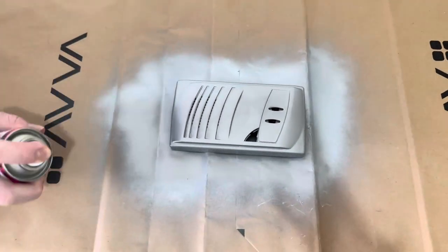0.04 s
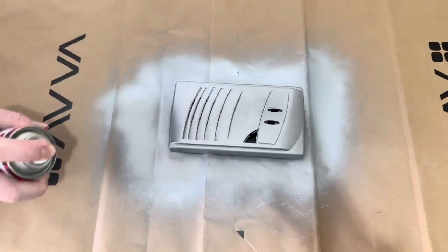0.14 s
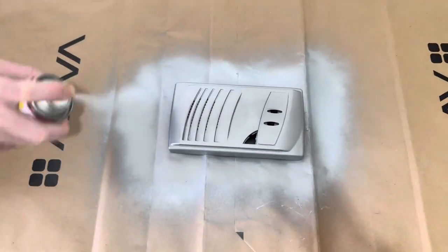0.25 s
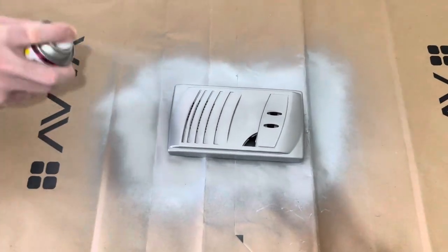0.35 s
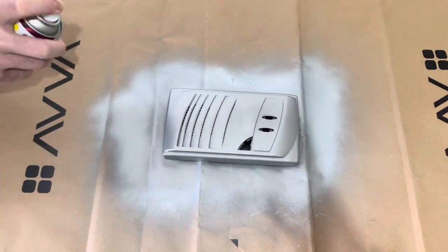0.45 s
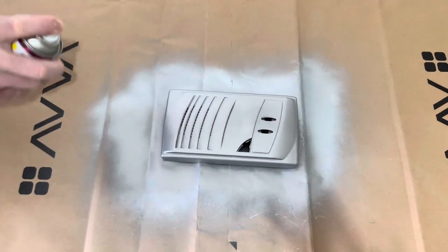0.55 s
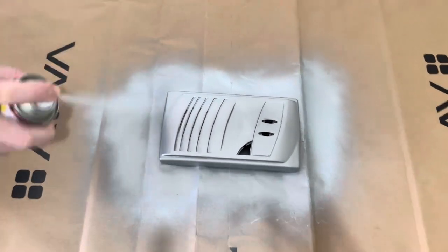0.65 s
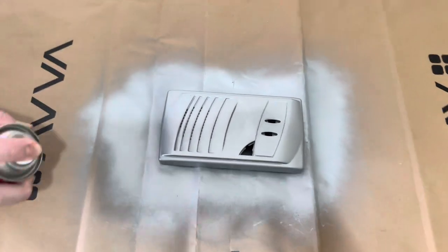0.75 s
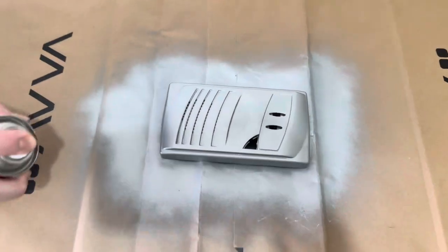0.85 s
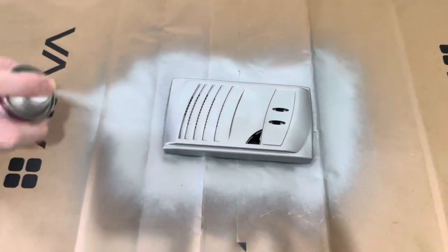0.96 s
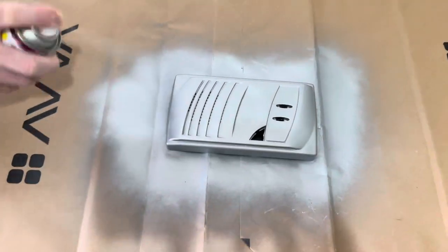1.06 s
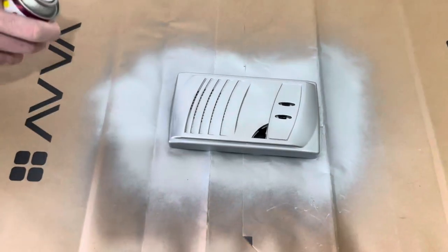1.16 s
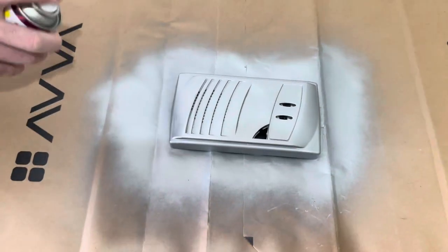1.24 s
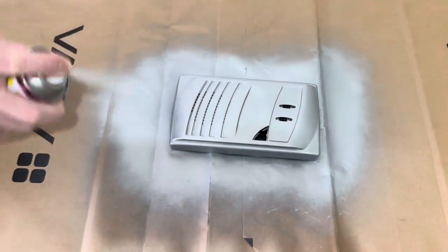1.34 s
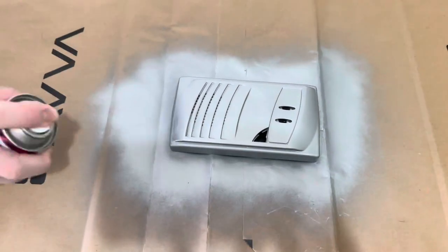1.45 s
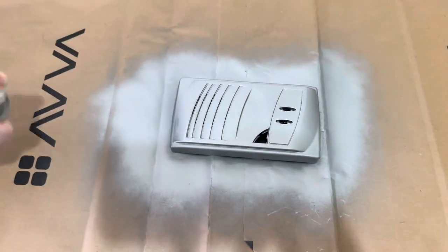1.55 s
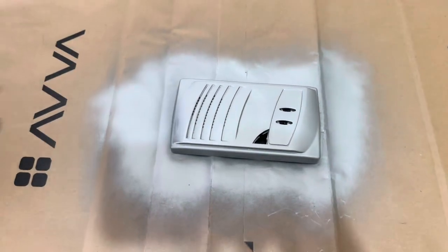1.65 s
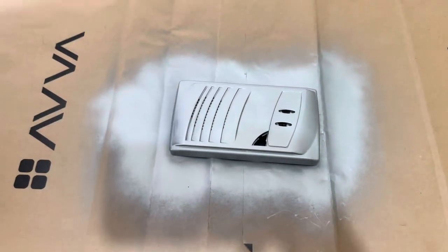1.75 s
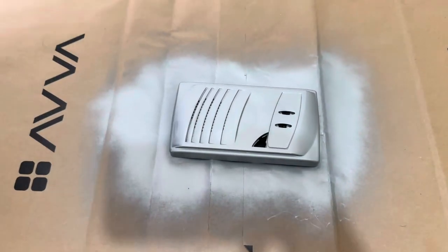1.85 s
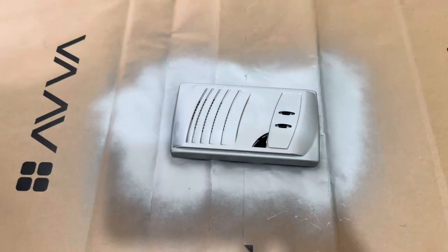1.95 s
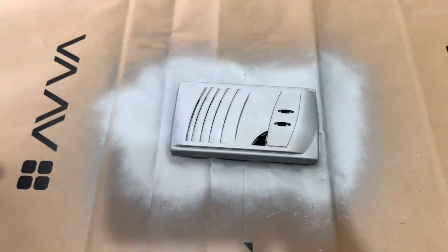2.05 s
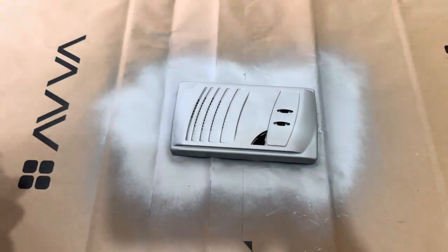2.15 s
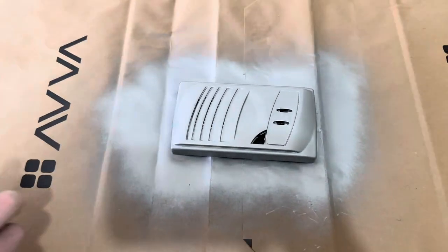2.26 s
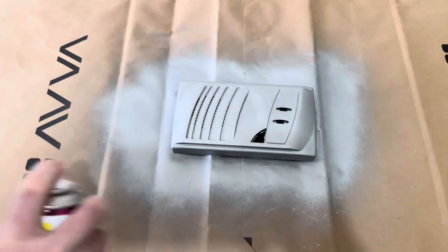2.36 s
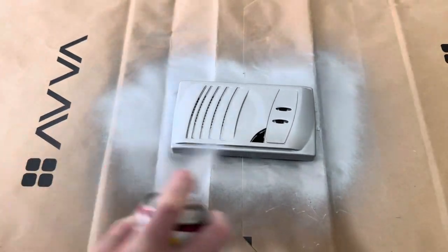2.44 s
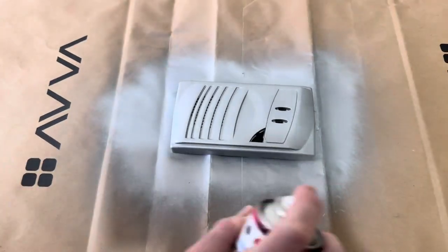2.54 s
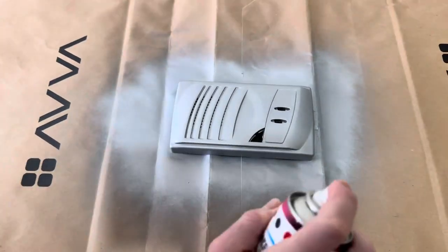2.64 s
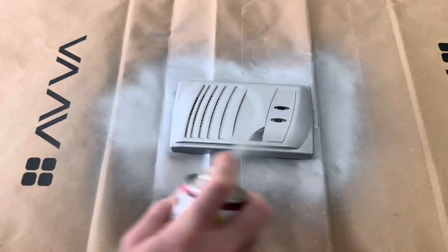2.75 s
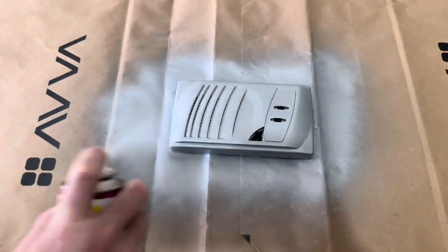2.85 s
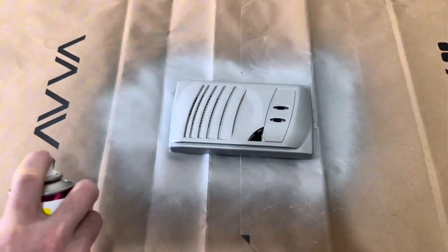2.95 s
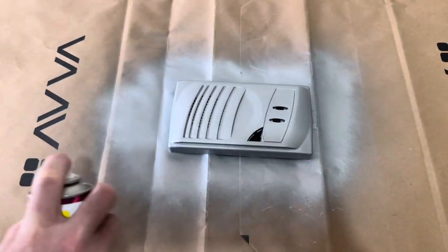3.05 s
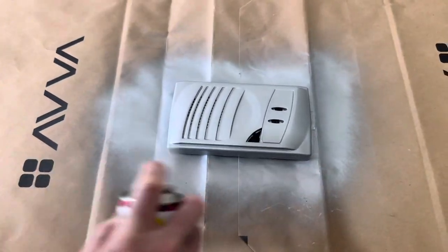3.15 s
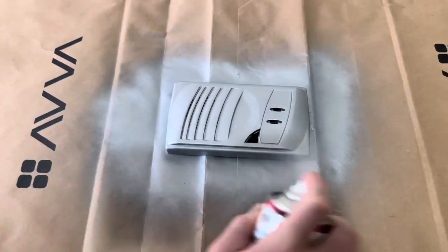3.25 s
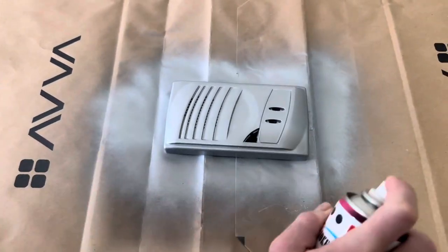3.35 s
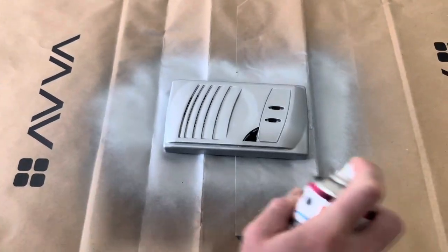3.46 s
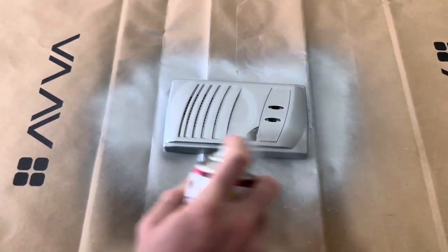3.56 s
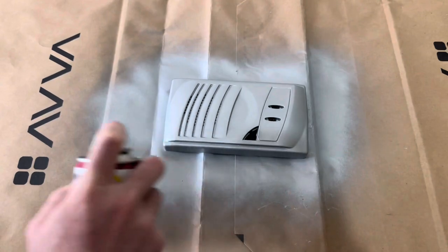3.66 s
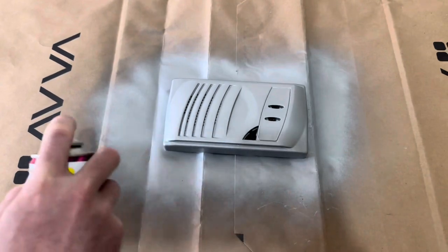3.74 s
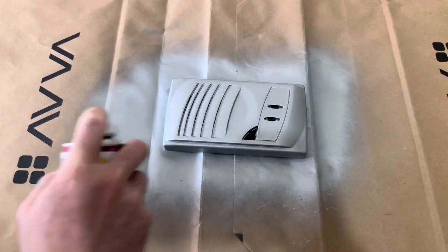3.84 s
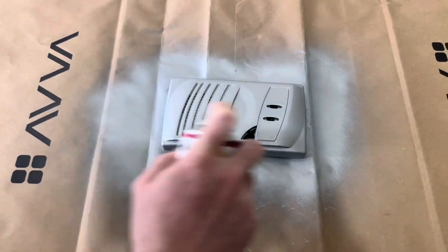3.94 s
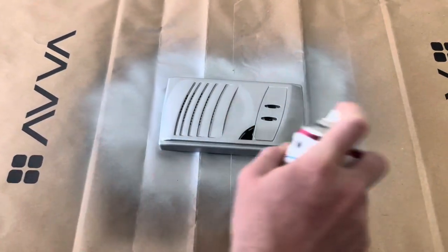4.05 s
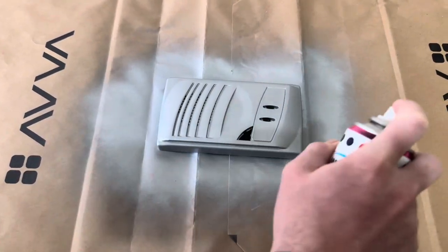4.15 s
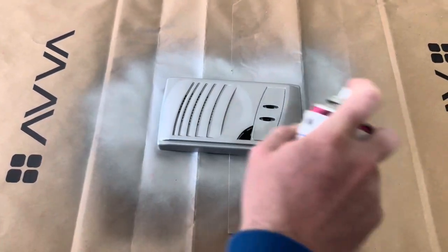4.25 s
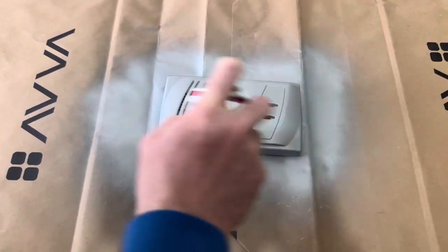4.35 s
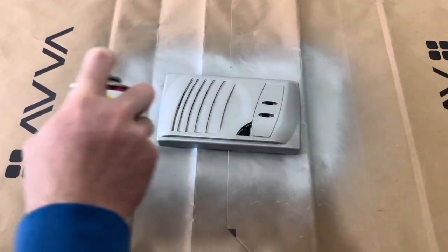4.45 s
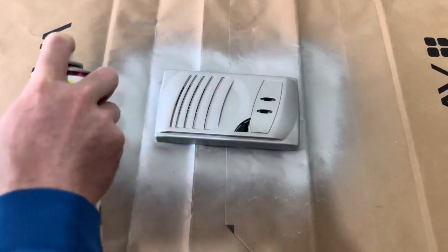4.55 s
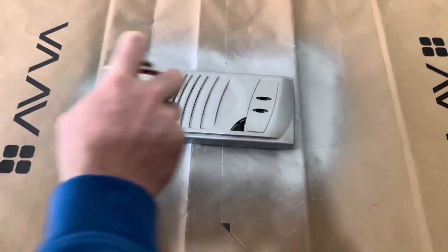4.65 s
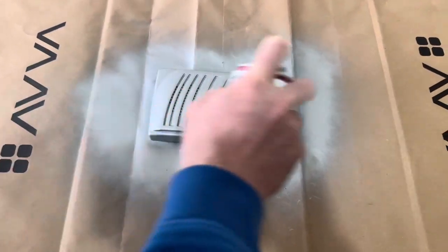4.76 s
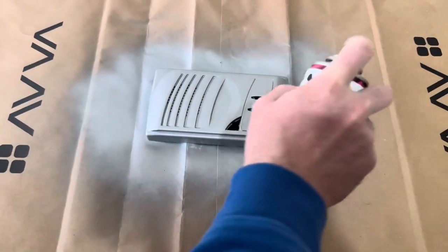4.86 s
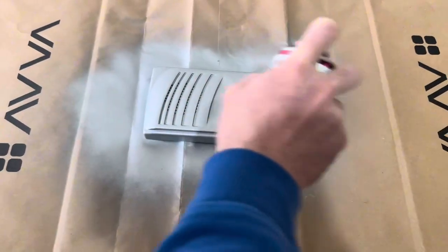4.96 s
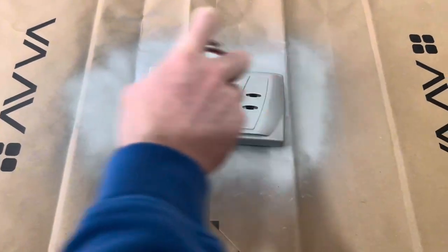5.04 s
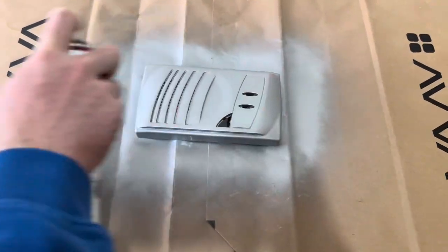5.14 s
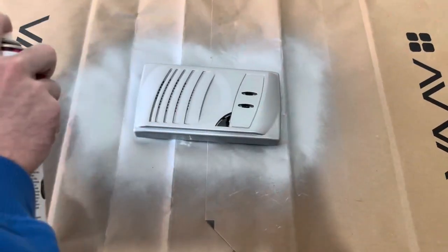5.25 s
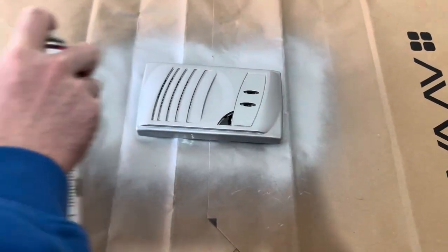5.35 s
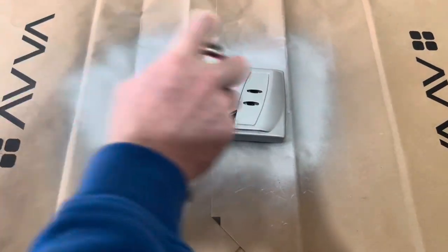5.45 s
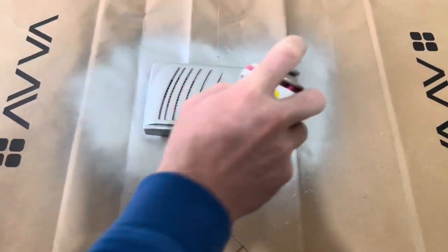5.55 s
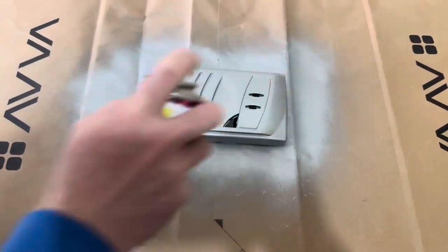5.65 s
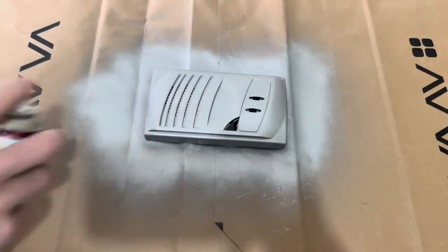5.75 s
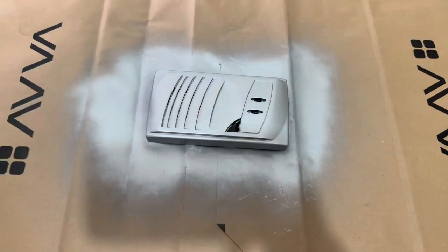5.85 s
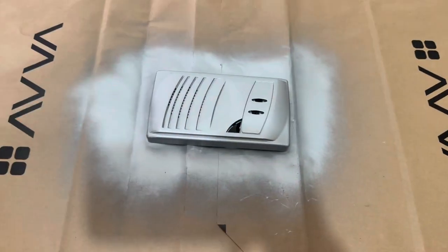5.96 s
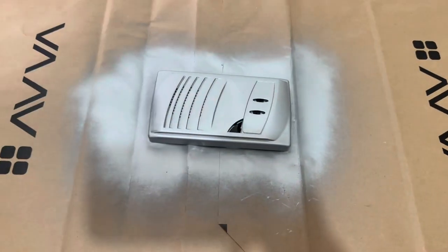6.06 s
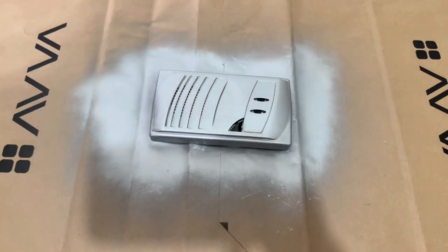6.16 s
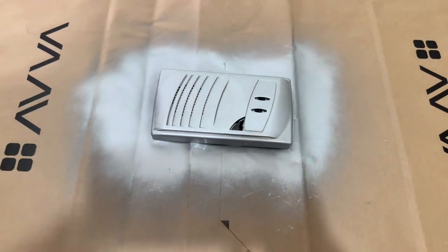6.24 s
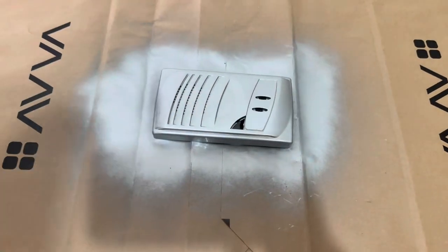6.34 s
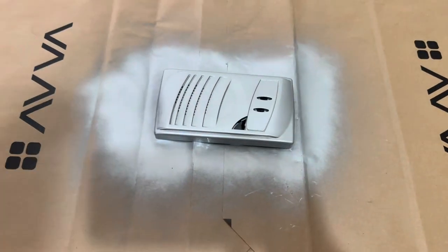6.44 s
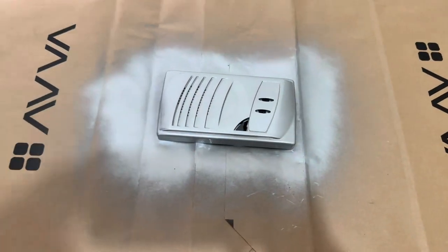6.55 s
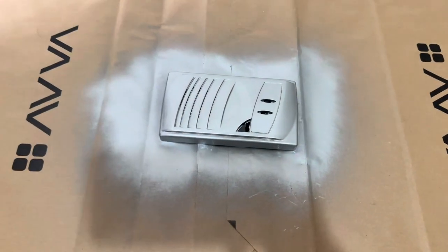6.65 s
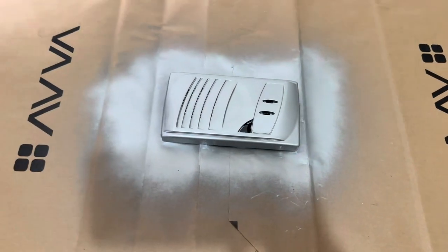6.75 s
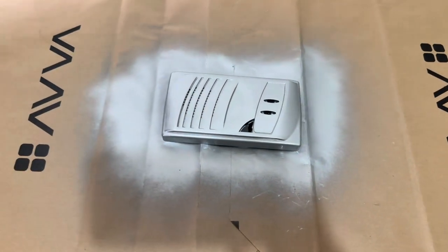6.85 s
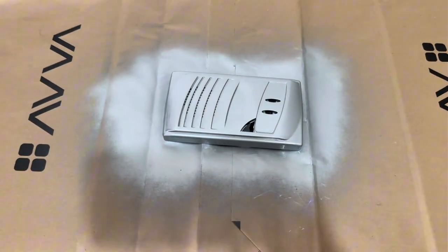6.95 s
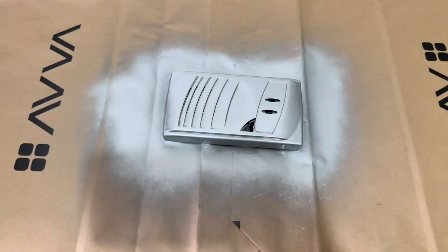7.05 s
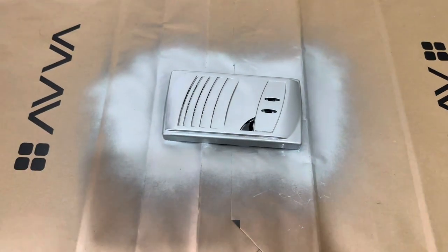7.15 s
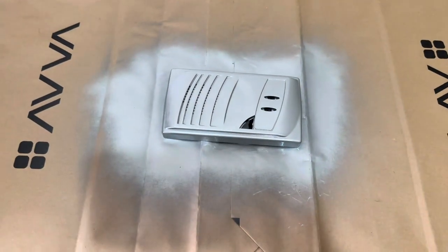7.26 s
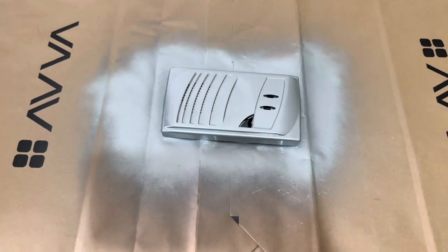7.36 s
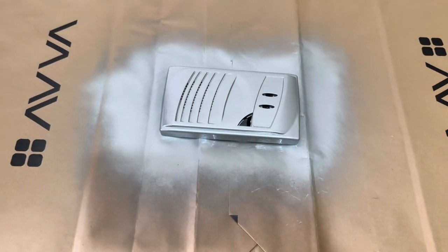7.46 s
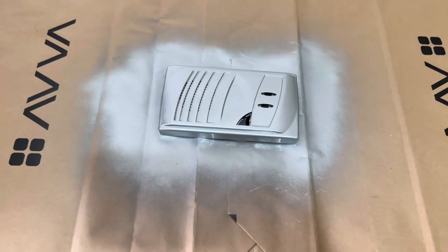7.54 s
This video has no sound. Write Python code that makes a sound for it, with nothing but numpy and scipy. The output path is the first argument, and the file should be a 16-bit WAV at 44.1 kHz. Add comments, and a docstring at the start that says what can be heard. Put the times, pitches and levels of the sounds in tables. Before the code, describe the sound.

Close in a small room, a spray can gives five short hissing puffs, the jet roaring softly across a box on cardboard. The mixing ball then rolls and knocks brightly in the steel can. Nine more puffs follow at an even pace, then a brief rattle, a soft thud, and a longer rattle with rustling sleeve. Phone pickup, faint rumble and short echo.

```python
"""In a small room, a paint can sprays short bursts over a small box on a cardboard sheet, close under a phone.
The jet is shaped noise: a hiss at the nozzle and a roar where it strikes. Sheet, box and air hum as wavering
tones. Between bursts the mixing ball rolls and knocks, as noise grains and short pushes ringing the steel can.
There are also two finger taps, a soft thud, a sleeve rustling as patchy noise, a faint rumble and room echo."""
import sys
import numpy as np
from scipy import signal
from scipy.fft import rfft, irfft
from scipy.io import wavfile
from scipy.ndimage import uniform_filter1d

SR = 44100
rng = np.random.default_rng(int(sys.argv[2]) if len(sys.argv) > 2 else 0)


def file_out(sig):
    """Save sig as 16-bit WAV at sys.argv[1]."""
    # one column per channel
    cols = np.atleast_2d(sig).T
    # limit, then scale
    lim = np.clip(cols, -1, 1)
    pcm = np.round(lim * 32767).astype(np.int16)
    wavfile.write(sys.argv[1], SR, pcm)


N = 335160

# Room and pickup
# slow level curve of the room rumble: t/s, level/dB
RUMBLE_LEVEL = [(0, -82), (.6, -78.5), (1.3, -83.5), (2.0, -69.5), (3.1, -77.5), (4.6, -80), (5.7, -79.5),
                (5.9, -80), (6.6, -80), (7.1, -70.5), (7.6, -65.5)]
# colour of the rumble: f/Hz, level per Hz/dB
RUMBLE_COLOUR = [(12, -33), (20, 4.5), (58, -1), (175, -2), (742, -9.5), (1750, -6.5), (3410, -17.5),
                 (5980, -20.5), (8700, -17.5), (12000, -32.5), (15600, -69), (22000, -120)]
# low resonances of the room: f/Hz, width/Hz, level/dB
ROOM_MODES = [(50, 7.8, 1), (126, 6.1, -7.5), (238, 18, -6)]
# time for the echo to fall by 60 dB: f/Hz, time/s
ROOM_T60 = [(60, 0.94), (300, 0.34), (1000, 0.4), (4000, 0.36), (10000, 0.16), (16000, 0.12)]
# how alike the two microphone ports hear: f/Hz, likeness/0-1
LIKENESS = [(30, 0.9), (170, 0.71), (350, 0.6), (600, .2), (1500, 0.1), (6000, 0), (9000, 0), (12500, 0.3),
            (16000, 1)]
# left port over right: f/Hz, level/dB
LEFT_LEAN = [(200, -0.5), (600, -0.5), (4400, 1.5), (9000, -.5)]
ROOM_DB, PORT_LAG_S = -1, 0.00015  # echo level; the left port hears this much later
TOP_HZ = 15900  # the phone cuts above this
OCTAVE_CENTRES_HZ = 40 * 2. ** np.arange(10.)

# Sleeve and thud
# sleeve strokes: loudest at t/s, level/dB, rise/dB per s
SLEEVE_STROKES = [(2.37, -61, 88), (5.8, -69, 195.5), (6.05, -67, 114), (6.18, -69, 62), (6.328, -63.5, 57),
                  (7.12, -71.5, 43), (7.48, -61.5, 35)]
# colour of the cloth noise: f/Hz, level per Hz/dB
CLOTH_COLOUR = [(250, -15.5), (500, -11.5), (900, -6.5), (1900, -2), (2700, -6), (3600, -13.5),
                (5200, -11.5), (6000, -9.5), (7000, -19), (10000, -27.5), (15000, -41)]
SLEEVE_FALL_DB_PER_S = 97.5
ARM_RUMBLE_DB = -11.5  # low stir of the moving arm, over the sleeve level
# resonances of the cardboard under the thud: f/Hz, width/Hz, level/dB
CARDBOARD = [(266, 97, 0.5), (537, 170, -5), (712, 170, -5.5), (1810, 820, -15.5)]
THUD_S, THUD_DB, THUD_T60_S = 6.533, -51.5, 0.28

# Ball and can
# rolls along the wall: t/s, length/s, ring level at start/dB, change to the end/dB, body level/dB, note level/dB
ROLLS = [(1.605, 0.15, -57.5, 3.5, -82, -81), (1.817, 0.057, -56, -1.5, -79, -58.5),
         (1.89, 0.11, -50, -4, -77, -83), (1.979, 0.069, -54.5, -10, -80, -81),
         (5.585, 0.19, -51, -5.5, -63.5, -74), (6.526, 0.12, -66.5, -7, -72.5, -68),
         (6.81, 0.13, -71, -3, -97, -63.5), (6.982, 0.079, -61, -4, -89, -66),
         (7.216, 0.074, -68, -9, -63, -66), (7.283, 0.034, -60.5, 5, -71, -62),
         (7.314, 0.2, -50, -15, -46.5, -69), (7.547, 0.075, -46, -10.5, -62, -58)]
# ball knocks: t/s, peak level of the push/dB
KNOCKS = [(1.6315, -44), (1.6806, -41), (1.8223, -56), (1.8338, -47), (1.843, -50), (1.8736, -34),
          (1.888, -53), (1.9074, -38), (1.931, -57), (2.0422, -38.5), (2.052, -60), (2.0634, -53),
          (5.6941, -47), (6.815, -66), (6.9876, -50), (7.0175, -53), (7.2186, -45.5), (7.2537, -45),
          (7.2882, -41), (7.3119, -35.5), (7.367, -35), (7.5513, -36), (7.577, -41)]
# dull finger taps on the can: t/s, peak level of the push/dB
TAPS = [(0.8249, -51.5), (0.9522, -60)]
# resonances of the can wall: f/Hz, width/Hz, level/dB
CAN_WALL = [(1555, 257, -8), (2410, 510, -6), (3930, 320, -7), (4280, 100, 0), (4740, 400, -2.5),
            (6030, 330, -6), (6760, 1300, -13), (9010, 1200, -12), (14800, 520, -17)]
# lower resonances of the whole can: f/Hz, width/Hz, level/dB
CAN_BODY = [(505, 61, -9), (814, 60, 0.5), (1106, 120, -3.5)]
# single note of the wall under a rolling ball: f/Hz, width/Hz, level/dB
WALL_NOTE = [(1726, 30, 0)]
ROLL_ARCH_DB = 1.5  # lift in mid roll
KNOCK_BODY_DB, TAP_RING_DB = -17.5, 0.5  # how much a knock rings the body, and a tap the wall

# Spray
# bursts: valve opens t/s, held/s, hiss level/dB, box roar level/dB,
# share of the stroke at which the jet crosses the box/0-1, box hum level/dB, air thump level/dB
BURSTS = [(-0.13, 0.15, -35.5, -56.5, 0.52, -64.5, -53.5), (0.238, 0.14, -37, -54, 0.67, -59, -72),
          (0.618, 0.13, -36.5, -49.5, 0.57, -67, -76.5), (0.977, 0.13, -35.5, -53.5, 0.68, -51, -70.5),
          (1.339, 0.14, -36, -59, 0.5, -71, -72), (2.413, 0.18, -35.5, -50.5, 0.36, -63.5, -54.5),
          (2.776, 0.15, -36.5, -48.5, 0.27, -67.5, -60), (3.156, 0.18, -35.5, -53, 0.19, -62.5, -62),
          (3.526, 0.15, -36, -47.5, 0.57, -81, -68.5), (3.913, 0.17, -37, -45.5, 0.49, -66, -62.5),
          (4.287, 0.17, -36.5, -48.5, 0.56, -79, -74), (4.685, 0.17, -36, -57, 0.52, -71, -77),
          (5.034, 0.16, -37.5, -64, 0.47, -68.5, -63), (5.39, 0.18, -36, -61, 0.52, -78, -67.5)]
# colour of the nozzle hiss: f/Hz, level per Hz/dB
HISS_COLOUR = [(35, -41.5), (60, -8.5), (91, -21.5), (133, -12), (172, -19.5), (515, -35), (607, -28),
               (767, -17.5), (1910, -7), (2970, -9.5), (9790, 0), (11300, -8), (14900, 3), (16000, -12)]
# cavity behind the nozzle: f/Hz, width/Hz, level/dB
NOZZLE = [(2370, 240, 0)]
# roar of the jet on the box: f/Hz, width/Hz, level/dB
BOX_ROAR = [(947, 160, 1), (1210, 190, 0), (1400, 250, -3)]
# lower roar of the jet on the cardboard: f/Hz, width/Hz, level/dB
LOW_ROAR = [(500, 570, 0)]
# gust under the roar: f/Hz, width/Hz, level/dB
GUST = [(150, 160, 0)]
# hums of sheet, box and air in turn: f/Hz, build-up time/s, buffeting/dB
HUMS = [(128, 0.037, 3.5), (219, 0.059, 2.9), (50, .03, 5.0)]
# quick presses swell to their end and long ones sag; a press of EVEN_S does neither
EVEN_S, SWELL_DB_PER_S = 0.16, -57
LOW_ROAR_DB, LOW_FOLLOWS = -57, 0.28  # base level; dB of change per dB of box roar
THUMP_TO_ROAR_DB, THUMP_TO_GUST_DB = 1.5, -4  # a thump of air deepens the roar and gusts below it
SHEET_HUM_DB, THUMP_TO_SHEET_DB = -68.5, -0.5  # push on the sheet by the flow, and by an air thump


def undb(db):
    """Turns decibels into a gain."""
    return 10 ** (np.asarray(db) / 20)


def unit(x):
    """Scales a signal to rms 1."""
    return x / np.sqrt(np.mean(x ** 2))


def across(table, hz):
    """Reads a table at hz, with straight lines over log frequency."""
    f, v = np.transpose(table)
    return np.interp(np.log(np.maximum(hz, 1)), np.log(np.maximum(f, 1)), v)


def octave(hz, centre):
    """Gain of one of a set of crossfading bands two octaves apart; the outer ones run on."""
    inside = np.clip(hz, OCTAVE_CENTRES_HZ[3], OCTAVE_CENTRES_HZ[9])
    steps = np.log2(inside / centre) / 2
    return np.cos(np.pi / 2 * np.clip(steps, -1, 1))


def along(curves, off=-140):
    """Lays level curves in dB on the time axis, with the level off between them."""
    level_db, t = np.full(N, 1. * off), np.arange(N) / SR
    for rows in map(np.array, curves):
        on = (t >= rows[0, 0]) & (t <= rows[-1, 0])
        level_db[on] = np.interp(t[on], rows[:, 0], rows[:, 1])
    return level_db


def soft(db):
    """Gain of a dB curve with its steps rounded."""
    return uniform_filter1d(undb(db), size=400)


def walk(rate):
    """A random wander: a new level rate times a second, joined by slopes; spread near 1."""
    hold = int(SR / rate)
    steps = np.repeat(rng.standard_normal(N // hold + 1), hold)
    return 1.2 * uniform_filter1d(steps, hold)[:N]


def pan(db):
    """Left and right gains that differ by db."""
    return undb(np.array([db, -db]).reshape(2, -1) / 2)


def ports(a, b, gain):
    """Both ports hear sound coloured by gain; the right hears a earlier and partly replaced by the unrelated b."""
    n = a.shape[-1]
    hz = np.fft.rfftfreq(n, 1 / SR)
    alike = np.clip(across(LIKENESS, hz), 0, 1)
    earlier = np.exp(2j * np.pi * hz * PORT_LAG_S)
    left = rfft(a)
    right = alike * left * earlier + np.sqrt(1 - alike ** 2) * rfft(b)
    return irfft(np.array([left, right]) * pan(across(LEFT_LEAN, hz)) * gain(hz), n)


def shape(table):
    """Gain over frequency that follows a colour table."""
    return lambda hz: undb(across(table, hz))


def noise(gain):
    """Stereo noise of rms 1 coloured by gain."""
    return unit(ports(*rng.standard_normal((2, N)), gain))


def patchy(table):
    """Noise in bands two octaves apart that each waver on their own, as eddies come and go."""
    total = 0
    for centre in OCTAVE_CENTRES_HZ[3::2]:
        band = ports(*rng.standard_normal((2, N)), lambda hz: shape(table)(hz) * octave(hz, centre))
        total = total + undb(2.4 * walk(25.05)) * band
    return unit(total)


def modes(table):
    """Combined response of several resonances, neighbours in opposite phase."""
    return lambda hz: sum((-1) ** k * undb(db) * 1j * hz * w / (f ** 2 - hz ** 2 + 1j * hz * w)
                          for k, (f, w, db) in enumerate(table))


def ring(push, table):
    """Resonances driven by noise under the envelope push; a steady push of 1 gives rms near 1."""
    gain = modes(table)
    spread = np.sqrt(np.mean(np.abs(gain(np.fft.rfftfreq(N, 1 / SR))) ** 2))
    return ports(*(push * rng.standard_normal((2, N))), gain) / spread


def arm():
    """Gain of the arm's movement: each stroke swells at its own pace, and all die away alike."""
    t = np.arange(N) / SR
    strokes_db = [db - np.where(t < s, rise * (s - t), SLEEVE_FALL_DB_PER_S * (t - s))
                  for s, db, rise in SLEEVE_STROKES]
    return soft(np.max(strokes_db, axis=0))


def room_rumble():
    """Slowly wavering low noise and room resonances; the noise grows when the arm moves."""
    waver = undb(2.5 * walk(9))
    calm = undb(along([RUMBLE_LEVEL]))
    stirred = np.hypot(calm, arm() * undb(ARM_RUMBLE_DB))
    return waver * (stirred * noise(shape(RUMBLE_COLOUR)) + calm * ring(undb(-2), ROOM_MODES))


def room(dry):
    """Echo of the room: the sound smeared by noise that dies away octave by octave."""
    t = np.arange(SR // 2) / SR
    tail = 0
    for centre in OCTAVE_CENTRES_HZ:
        fade = undb(-60 * t / across(ROOM_T60, centre)) * (t > .004)  # no echo in the first 4 ms
        band = ports(*rng.standard_normal((2, len(t))),
                     lambda hz: np.cos(np.pi / 2 * np.clip(np.log2(np.maximum(hz, 1) / centre), -1, 1)))
        tail = tail + band * fade / np.sqrt(np.sum(fade ** 2))
    return undb(ROOM_DB) * signal.fftconvolve(dry, tail, axes=1)[:, :N]


def sleeve():
    """Cloth sliding on cloth: soft noise of uneven strength."""
    return arm() * undb(1.5 * walk(50)) * noise(shape(CLOTH_COLOUR))


def thud():
    """Something soft comes down on the cardboard and makes it ring briefly."""
    since = np.maximum(np.arange(N) / SR - THUD_S, 0)
    push = (1 - np.exp(-since / 0.0059)) * undb(THUD_DB - 60 * since / THUD_T60_S)
    return ring(push, CARDBOARD)


def blows(table):
    """A short push for each blow, at full strength at once and falling within a few ms."""
    push = np.zeros(N)
    fall = np.exp(-np.arange(500) / SR / 0.0026)
    for s, db in table:
        start = int(s * SR)
        push[start:start + 500] += undb(db) * fall
    return push


def ball():
    """The rolling ball ticks in dense uneven grains; knocks and taps are short pushes into the same can."""
    roll_db = along([[(s, db), (s + d / 2, db + fade / 2 + ROLL_ARCH_DB), (s + d, db + fade)]
                     for s, d, db, fade, _, _ in ROLLS])
    # the low body changes faster than the ring; the wall note swells past mid roll
    body_db = along([[(s, db), (s + d, db + 2.3 * fade)] for s, d, _, fade, db, _ in ROLLS])
    note_db = along([[(s, db - 16), (s + .6 * d, db), (s + d, db - 14)] for s, d, *_, db in ROLLS])
    ticks = rng.random(N) < 2000 / SR  # about 2000 a second
    grains = unit(ticks * undb(1.7 * rng.exponential(size=N)) * undb(2.5 * walk(90)))
    knocks, taps = blows(KNOCKS), blows(TAPS)
    wall = ring(grains * soft(roll_db) + knocks + undb(TAP_RING_DB) * taps, CAN_WALL)
    body_push = undb(2.74 * walk(40)) * soft(body_db) + undb(KNOCK_BODY_DB) * knocks + taps
    body = ring(body_push, CAN_BODY)
    note = ring(soft(note_db), WALL_NOTE)
    return (wall + body + note) * pan(2.0)


def hum(push, hz, lag_s, rough_db):
    """A slow resonance: a wavering, buffeted tone that builds and dies behind its push."""
    keep = np.exp(-1 / (lag_s * SR))
    swing = signal.lfilter([1 - keep], [1, -keep], push)
    swing = swing * undb(rough_db * np.array([walk(30), walk(30)]))  # left and right buffet apart
    pitch_hz = hz + 1.5 * rough_db * walk(20)
    return swing * np.sin(2 * np.pi * np.cumsum(pitch_hz) / SR)


def bounce(x, delay_s, gain):
    """Adds the reflection off the sheet; its moving delay sweeps a comb through the sound."""
    i = np.arange(N)
    return x + gain * np.array([np.interp(i - d * SR, i, v) for v, d in zip(x, delay_s)])


def spray():
    """Gas rushing out hisses at the nozzle, roars as the jet crosses the box, and pushes three low hums."""
    rows, t = np.array(BURSTS), np.arange(N) / SR
    lead_s = 0.014  # the flow starts this long before the listed opening
    now = np.clip(np.searchsorted(rows[:, 0] - lead_s, t) - 1, 0, None)
    opens, held, hiss_db, roar_db, cross, box_db, air_db = rows[now].T
    since = t - opens + lead_s
    share = np.minimum(since / held, 1.5)
    swell_db = SWELL_DB_PER_S * (held - EVEN_S)

    # the valve lifts over tens of ms, the finger arches through the stroke, then pressure bleeds off
    lift, shut = (1 - np.exp(-since / 0.016)) ** 4, np.maximum(since - held, 0)
    valve = lift * undb(-450 * shut)
    flow = valve * undb(swell_db * (2 * share - 0.5) - 4.23 * (2 * share - 1) ** 4)
    hiss = flow * undb(hiss_db + 0.65 * walk(120)) * patchy(HISS_COLOUR)
    whistle = ring(valve * undb(hiss_db - 9.0 - 27 * share), NOZZLE)

    # the drifting plume keeps the box sounding a little after the valve shuts
    plume = lift * undb(-123 * shut - 37 * (share - cross) ** 2 + 2.15 * walk(60))
    low_db = LOW_ROAR_DB + LOW_FOLLOWS * (roar_db - LOW_ROAR_DB)
    low = np.hypot(undb(low_db), undb(air_db + THUMP_TO_ROAR_DB))
    roar = ring(plume * undb(roar_db), BOX_ROAR) + ring(plume * low, LOW_ROAR)
    roar = roar + ring(flow * undb(air_db + THUMP_TO_GUST_DB), GUST)

    sheet_push = np.hypot(undb(SHEET_HUM_DB), undb(air_db + THUMP_TO_SHEET_DB))
    pushes = sheet_push, undb(box_db), undb(air_db)
    hums = sum(hum(flow * push, *mode) for push, mode in zip(pushes, HUMS))

    # each pass starts at its own height over the sheet and dips or lifts on the way
    height, dip, skew = rng.random((len(rows), 3))[now].T
    delay_s = .0004 + .0006 * height + .0003 * (dip - .5) * share
    hiss = bounce(hiss, [delay_s, delay_s * (.8 + .4 * skew)], gain=.35)
    return (hiss + whistle + roar) * pan(0.6), hums


def scene():
    """Adds all the sources, the room's echo of them (not of the hums) and the rumble."""
    jet, hums = spray()
    near = ball() + thud() + sleeve()
    # sounds close to the phone stir the room a little less than the jet does
    echo = room(jet + undb(-1.0) * near)
    return jet + hums + near + echo + room_rumble()


def record(dry):
    """The phone cuts the top with a steep low-pass filter."""
    return signal.sosfilt(signal.ellip(10, .2, 70, TOP_HZ, fs=SR, output="sos"), dry)


dry = scene()
out = record(dry)
file_out(out)
```